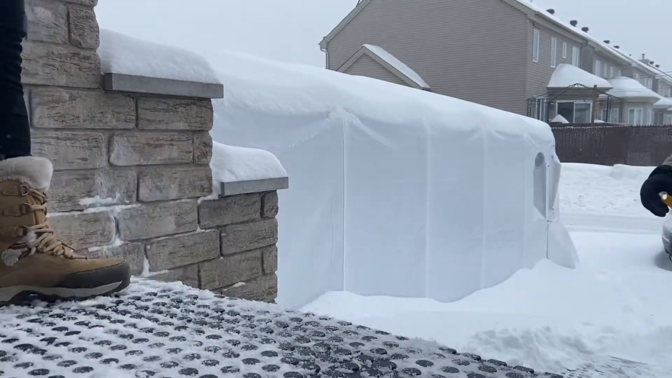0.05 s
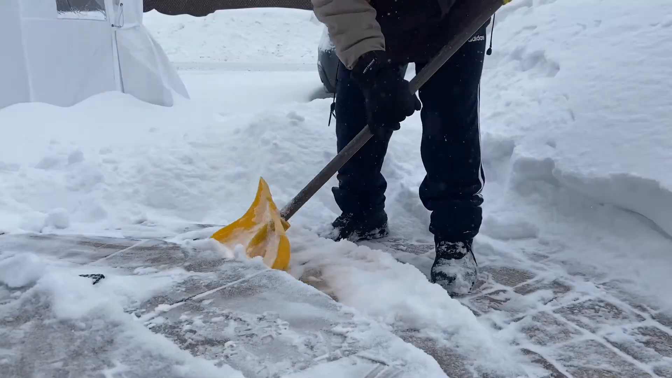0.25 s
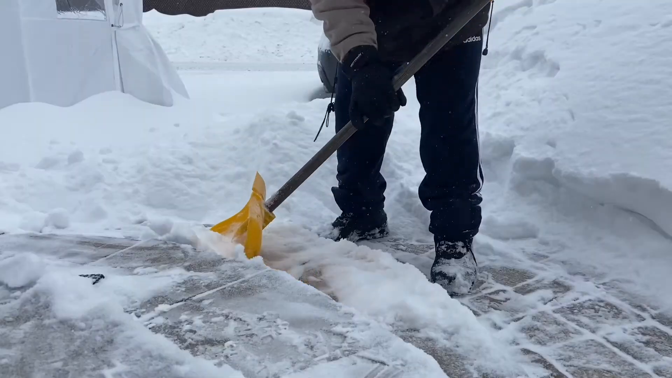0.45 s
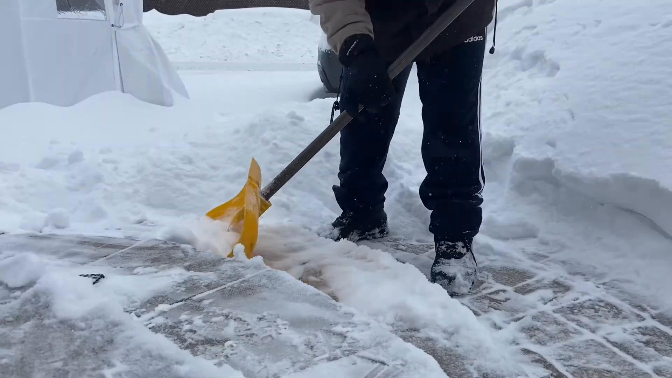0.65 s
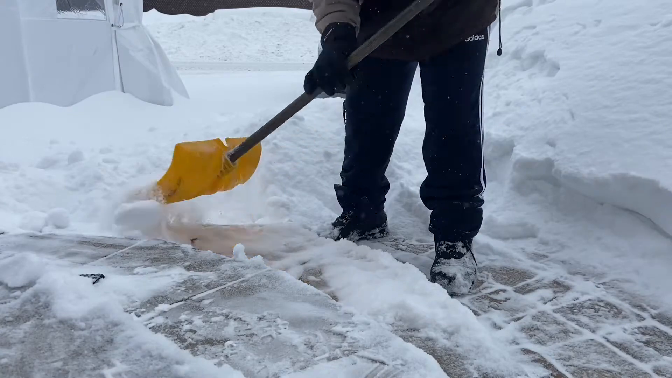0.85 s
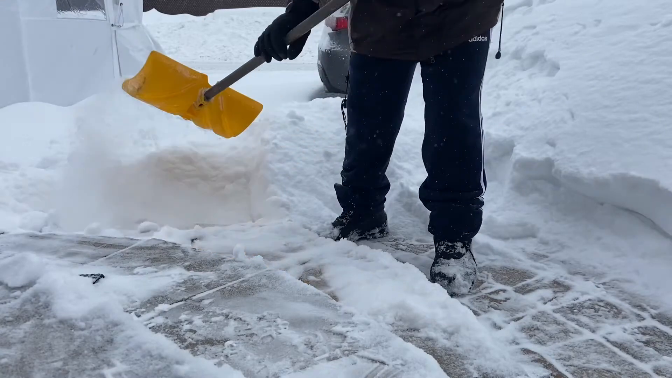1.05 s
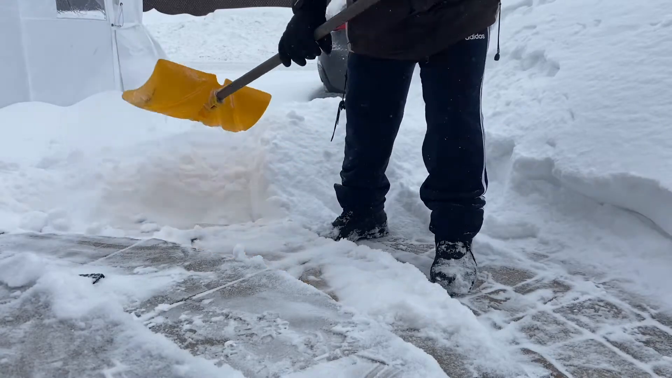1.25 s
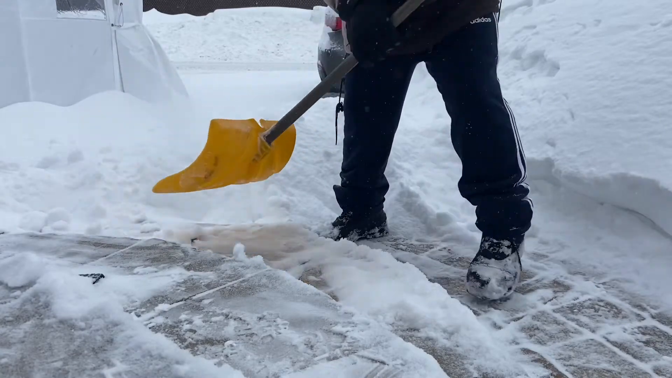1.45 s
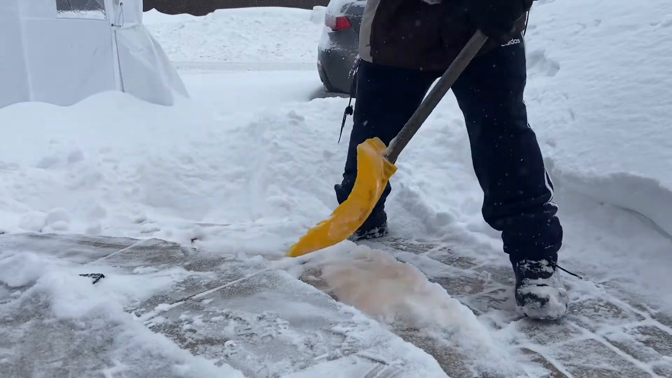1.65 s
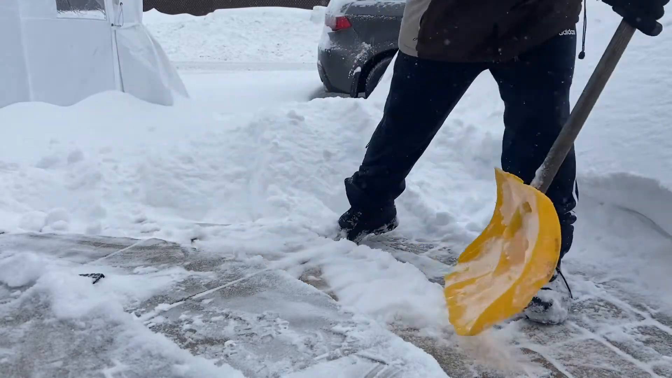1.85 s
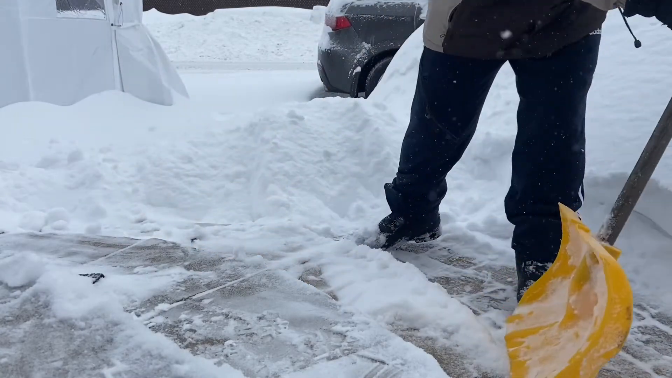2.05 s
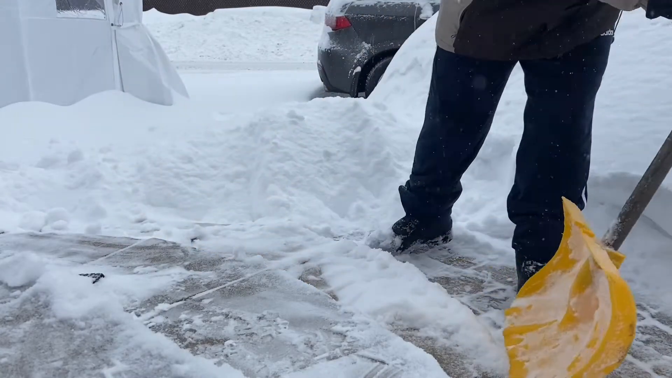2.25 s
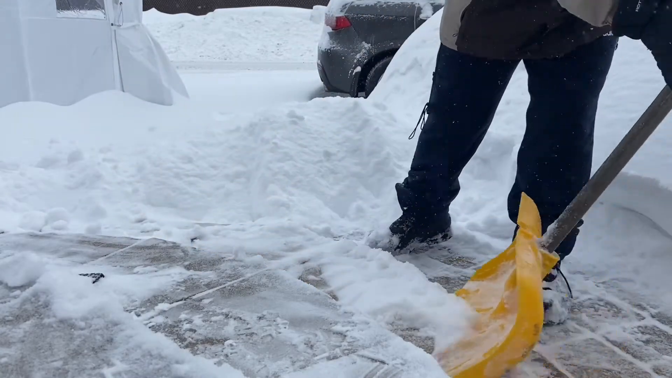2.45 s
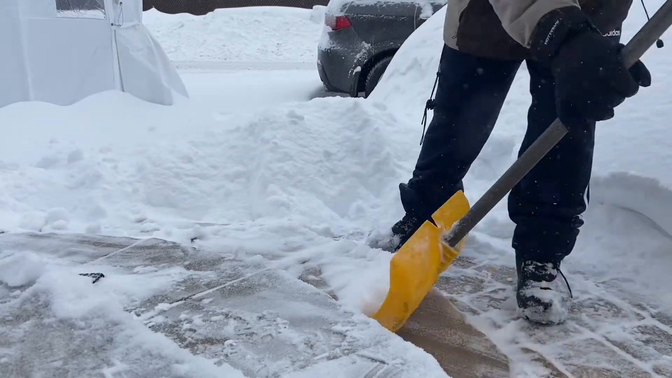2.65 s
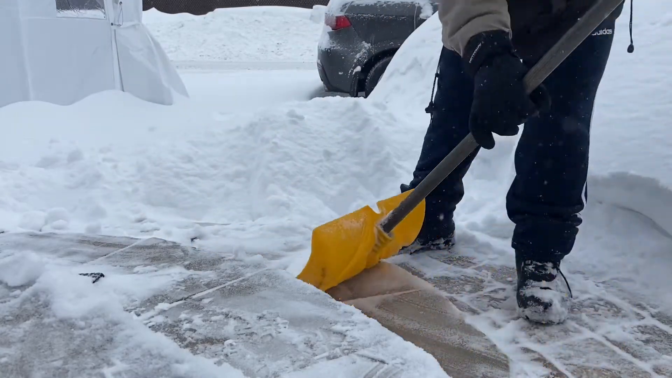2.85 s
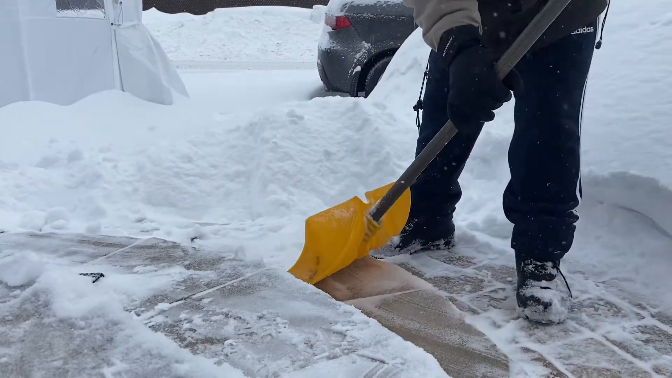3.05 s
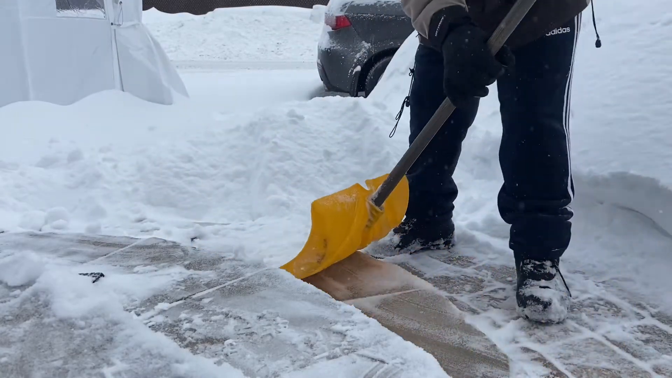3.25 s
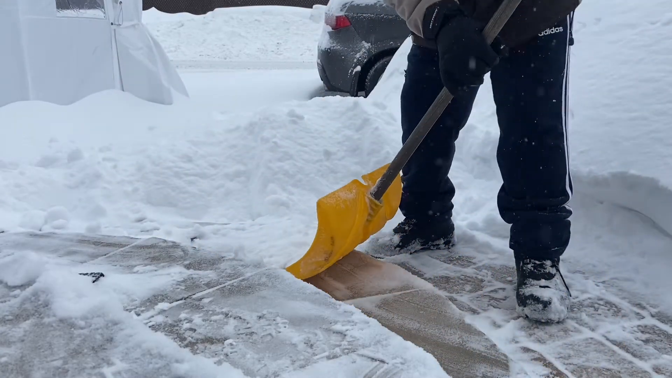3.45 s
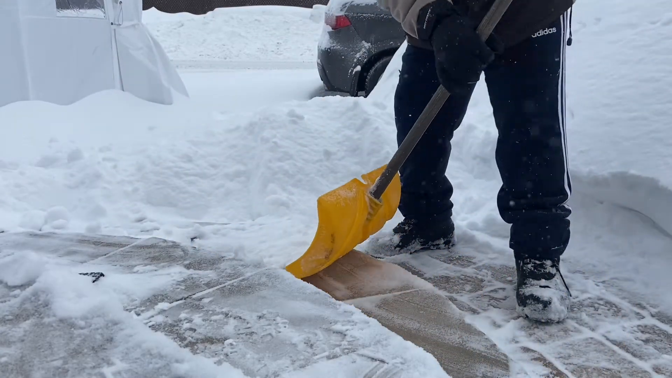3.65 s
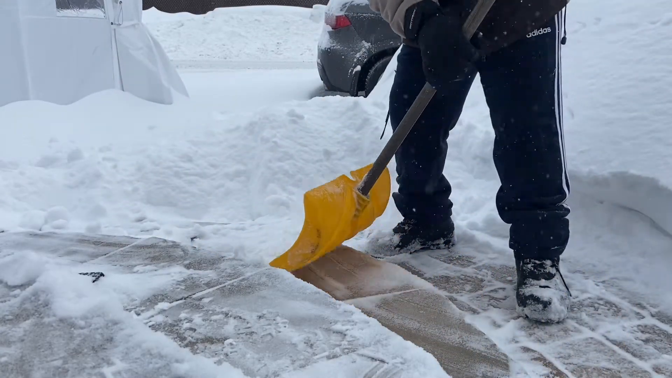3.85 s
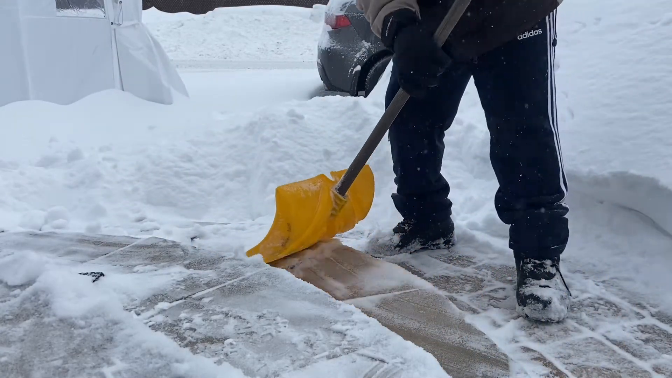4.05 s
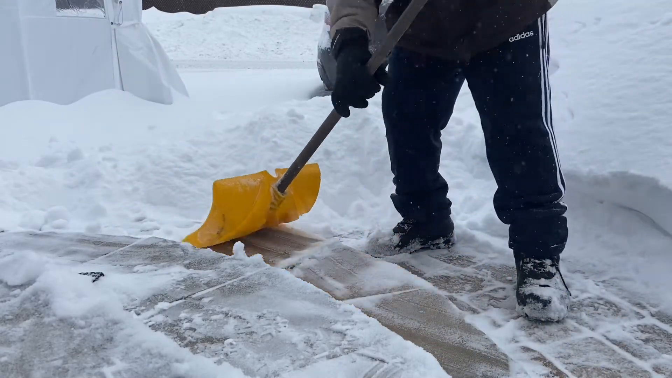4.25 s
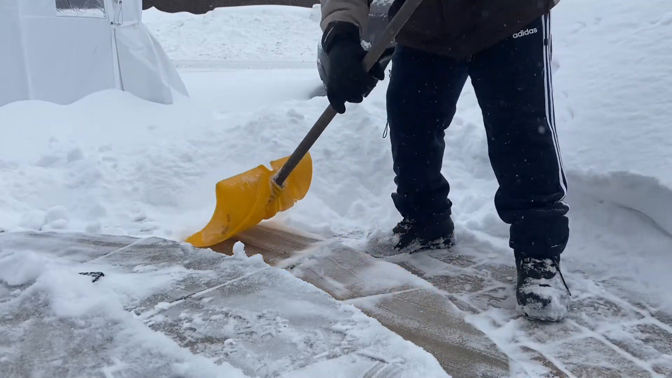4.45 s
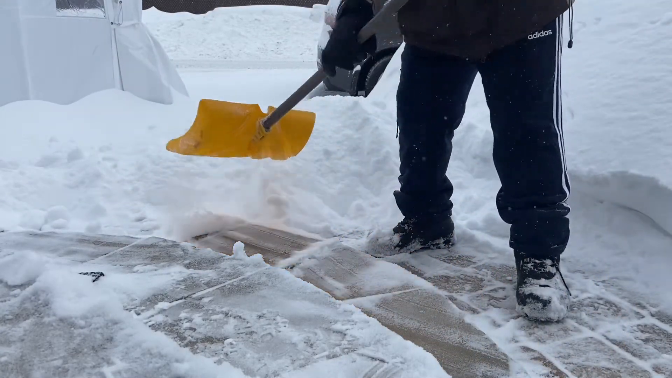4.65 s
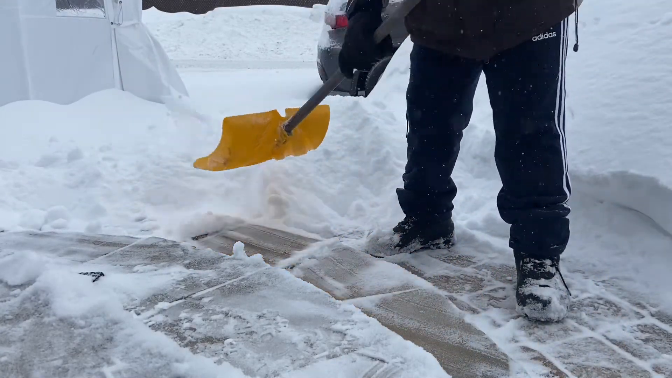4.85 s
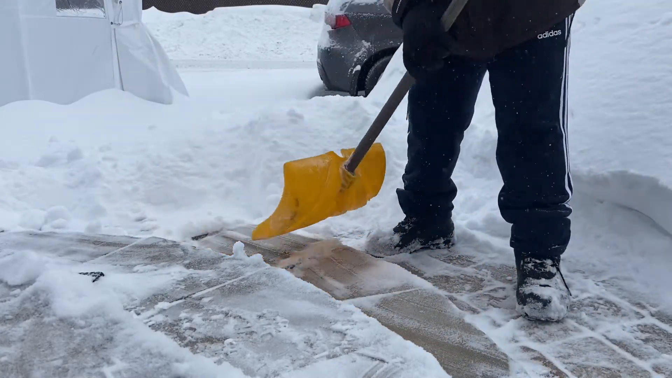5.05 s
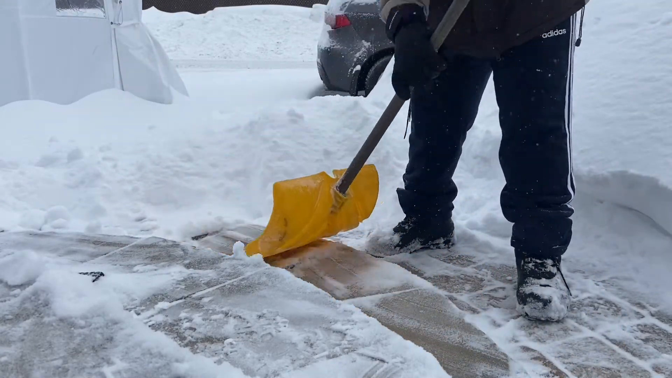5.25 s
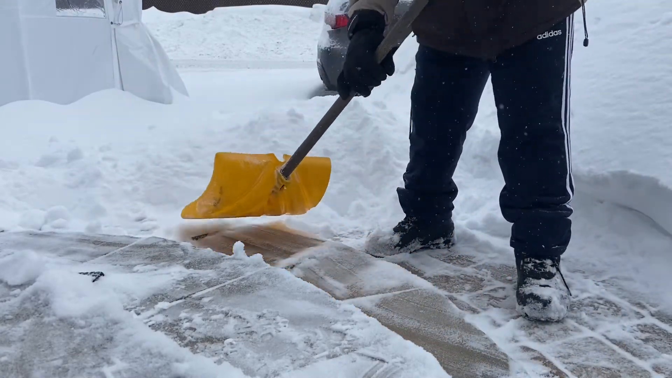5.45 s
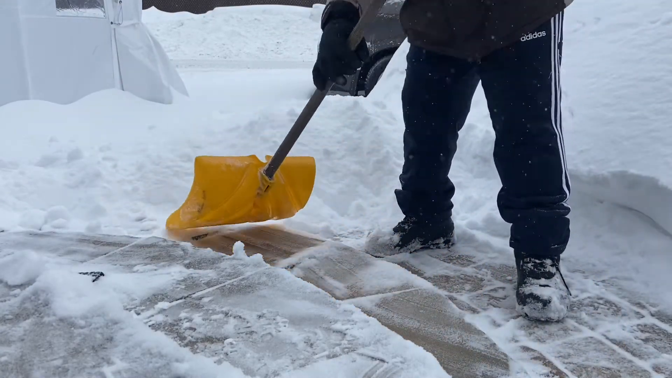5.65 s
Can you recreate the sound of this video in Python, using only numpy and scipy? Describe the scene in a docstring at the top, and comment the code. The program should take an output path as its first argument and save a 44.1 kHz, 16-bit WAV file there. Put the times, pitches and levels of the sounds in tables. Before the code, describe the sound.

A plastic snow shovel scrapes in short gritty strokes over paving stones and knocks hollowly on the joints in a quiet snowy yard.

```python
"""A snowy yard with paving stones: a plastic snow shovel scrapes in short strokes and knocks on the joints.
Grains drive the resonances of the dragged blade; each blow starts damped modes, and crisp snaps are short
ringing noise. Snow slides and clothes rustle as filtered grains between strokes; a hush, a far rumble
(shaped noise) and a faint hum (a wavering sine) fill the yard, and sparse echoes answer the shovel."""
import sys
import numpy as np
from scipy import signal
from scipy.fft import rfft, irfft
from scipy.io import wavfile

SR = 44100
rng = np.random.default_rng(int(sys.argv[2]) if len(sys.argv) > 2 else 0)


def master(y):
    """Save y as 16-bit WAV."""
    cut = np.clip(np.atleast_2d(y).T, -1, 1)
    pcm = np.round(cut * 32767)  # scale
    wavfile.write(sys.argv[1], SR, pcm.astype(np.int16))


N = 251370  # samples


def gain_of(db):
    """Level definition: decibels to amplitude ratio."""
    return 10 ** (np.asarray(db) / 20)


def evened(x):
    """Normalization to unit root-mean-square amplitude."""
    return x / np.sqrt(np.mean(x ** 2) + 1e-20)


def read(points, hz):
    """Interpolation along a logarithmic frequency axis."""
    f, value = np.transpose(points)
    return np.interp(np.log(hz + 1), np.log(f + 1), value)


def add(mix, s, sound, pan_db):
    """Superposition at time s with a level difference between the channels; positive pan_db leans left."""
    part = mix[:, round(s * SR):][:, :len(sound)]
    channel_db = np.array([[.5], [-.5]]) * pan_db
    part += sound[:part.shape[1]] * gain_of(channel_db)


def coloured(x, gain):
    """Linear filtering: multiplies the spectrum by gain(Hz)."""
    hz = np.fft.rfftfreq(x.shape[-1], 1 / SR)
    return irfft(rfft(x) * gain(hz), x.shape[-1])


def band(x, lo_hz, hi_hz):
    """Band-pass filtering with a Butterworth response."""
    return signal.sosfilt(signal.butter(2, [lo_hz, hi_hz], "band", fs=SR, output="sos"), x)


def wandering(count, step):
    """Slow random modulation: normal values every step samples, joined by straight lines."""
    steps = np.arange(0, N + step, step)
    return [np.interp(np.arange(N), steps, row) for row in rng.standard_normal((count, len(steps)))]


def ringing(x, modes, best_hz, slope_db, wander_db):
    """Forced resonance of a damped blade: modes near the moving pitch best_hz ring most; each waxes and wanes."""
    total, power = 0, 0
    for k, ((f, width, db), wander) in enumerate(zip(modes, wandering(len(modes), 2000))):
        octaves_off = abs(np.log2(f / best_hz))
        weight = gain_of(db - slope_db * octaves_off + wander_db * wander)
        drive = np.roll(x, 97 * k)  # each mode is caught a little further along the edge
        ring = evened(coloured(drive, lambda hz: 1 / (1 + 1j * (hz - f) / width) ** 2))
        total = total + weight * ring
        power = power + weight ** 2
    return total / np.sqrt(power)


def grains(per_s, spread_db, clump_db):
    """Random impulse process: tiny impacts of uneven size that come in clumps a few ms long."""
    size = gain_of(spread_db * np.minimum(rng.exponential(1, N), 5)) * rng.standard_normal(N)
    clumps = evened(band(rng.standard_normal(N), 27.0, 126))
    return evened(size * (rng.random(N) < per_s / SR) * gain_of(clump_db * clumps))


def columns(rows):
    """Envelope interpolation: sample range, a soft edge and the joined columns of one stroke."""
    s, *rest = np.transpose(rows)
    at = slice(round(s[0] * SR), min(round(s[-1] * SR), N))
    t = np.arange(at.start, at.stop) / SR
    edge = np.clip(np.minimum(t - s[0], s[-1] - t) / 0.0025, 0, 1)
    return at, edge, [np.interp(t, s, c) for c in rest]


# Pressure of the edge, one curve a stroke: t/s, grit level/dB, boom level re grit/dB
STROKES = [
    [(0, -60.5, -12), (.045, -55, -3), (.075, -60, -15)],
    [(0.09, -53.5, 9.5), (0.126, -33.5, -9), (0.168, -40, 13.5), (0.194, -36.5, 7.5), (0.264, -37.5, 15),
     (0.27, -40, 9)],
    [(.52, -54.5, -6), (.535, -40, 5), (.55, -63, 6), (.565, -44, 13), (.6, -31, 6), (.64, -36.5, 7),
     (.68, -33.5, 11.5), (.71, -78, 17)],
    [(2.17, -54.5, -16), (2.224, -37, -2), (2.26, -38.5, 4), (2.314, -29, -2.5), (2.47, -30, -16),
     (2.59, -29.5, 2.5), (2.65, -35, 2.5), (2.668, -26.5, -0.5), (2.796, -30.5, -11), (2.809, -27, -5)],
    [(3.09, -48.5, -8), (3.13, -45.5, 10), (3.17, -52.5, 7.5), (3.21, -56, 8)],
    [(3.76, -55.5, 0), (3.782, -43.5, -3), (3.808, -40, -2), (3.942, -44, 6.5), (4.082, -29, -0.5),
     (4.172, -29.5, -0.5), (4.178, -26, 4)],
    [(4.4, -51, 9), (4.415, -50, 21.5), (4.44, -31.5, 11.5), (4.46, -73, 14)],
    [(5.06, -59, -3), (5.076, -42, -4), (5.084, -37, -1.5), (5.222, -25, -0.5), (5.266, -36, 2.5),
     (5.3, -68, 7)],
    [(5.63, -54.5, 17.5), (5.656, -43.5, 4.5), (5.7, -45, 3.5)],
]
# Colour of each stroke: favoured boom f/Hz at start, at end, favoured rasp f/Hz at start, at end,
# fizz level re grit/dB (before FIZZ_LOSS), crunch depth/dB
COLOURS = [(700, 1100, 2500, 2200, -1, -8.5), (604, 890, 1850, 1800, -16, 3),
           (710, 510, 1180, 840, -16.5, 5.5), (420, 820, 2830, 2390, -14.5, 0),
           (400, 900, 1700, 2000, -16.5, 1), (560, 560, 2540, 2100, -8, -0.5),
           (476, 330, 1400, 1800, -15.5, 5), (387, 985, 2550, 1800, -13, 0),
           (408, 480, 1100, 1900, -5.5, 1)]
# Boom resonances of the dragged blade: f/Hz, half-width/Hz, level/dB
BOOM_MODES = [(350, 125, 15), (393, 37, -25), (667.5, 111, 13), (753, 380, 1.5), (881, 120, 4.5)]
# Rasp resonances of the edge on grit: f/Hz, half-width/Hz, level/dB
GRIT_MODES = [(1295, 87, 19.5), (1470, 270, -11), (1654, 510, 17), (2282, 150, 8), (2678, 110, 11.5),
              (3014, 130, 10.5), (3210, 690, 10), (3640, 1300, 4.5)]
# Spectrum of crushed snow: f/Hz, level/dB (relative)
FIZZ_SPECTRUM = [(2900, -41), (4000, -8.5), (5000, -7.5), (7000, -7.5), (10000, -12), (13000, -8.5),
                 (16400, -17)]
FIZZ_LOSS = .4  # dB of fizz lost for each dB of boom: a loaded blade muffles the snow
RUN_OUT_S = .006  # the edge slides on briefly after the last push


def scraping():
    """Forced resonance: grit and ice catch the edge; the blade booms, the edge rasps, crushed snow fizzes."""
    catches, bumps = grains(8000, 1.8, 1.3), grains(2000, 2.2, 1.6)
    later_catches = np.roll(catches, -round(.05 * SR))
    fizz = coloured(later_catches, lambda hz: gain_of(read(FIZZ_SPECTRUM, hz)))
    fizz = fizz / np.std(band(fizz, 5000, 8000))
    # load and angle shift the colour
    t, colour = np.arange(N) / SR, np.array(COLOURS)
    ends = np.ravel([(rows[0][0], rows[-1][0]) for rows in STROKES])
    boom_hz = np.interp(t, ends, colour[:, :2].ravel())
    rasp_hz = np.interp(t, ends, colour[:, 2:4].ravel())
    boom = ringing(bumps, BOOM_MODES, boom_hz, slope_db=10, wander_db=3)  # slope per octave
    grit = ringing(catches, GRIT_MODES, rasp_hz, slope_db=9, wander_db=3)
    crunch = evened(band(rng.standard_normal(N), 11.4, 62))  # crust breaks in bursts
    out = np.zeros((2, N))
    for rows, (*_, fizz_db, crunch_db) in zip(STROKES, COLOURS):
        run_out = (rows[-1][0] + RUN_OUT_S, *rows[-1][1:])
        at, edge, (db, boom_db) = columns([*rows, run_out])
        crisp = grit[at] + gain_of(fizz_db - FIZZ_LOSS * boom_db) * fizz[at]
        sound = gain_of(crunch_db * crunch[at]) * crisp + gain_of(boom_db) * boom[at]
        add(out, rows[0][0], sound * edge * gain_of(db), 0)
    return out


# Sliding snow and clothes, level of the middle range: t/s, level/dB
RUSTLE = [(0, -63), (.07, -62), (.085, -66), (.3, -64), (.5, -59.5), (.72, -53.5), (.8, -71.5), (.93, -69),
          (1, -56.5), (1.12, -70.5), (1.33, -57), (1.4, -68.5), (1.53, -54.5), (1.62, -62.5), (1.95, -61),
          (2.06, -60.5), (2.12, -49), (2.15, -57), (2.8, -38), (2.865, -91), (2.95, -51), (3.12, -52),
          (3.25, -71), (3.4, -63.5), (3.7, -77), (4.2, -55.5), (4.5, -60), (4.8, -95), (4.89, -64),
          (5.04, -56), (5.33, -72), (5.45, -66), (5.6, -83)]
DULL_DB, BRIGHT_DB = 2.5, -9.5  # dull part and 5-8 kHz of the bright part, mean re middle
COLOUR_DRIFT_DB = 3.5  # random drift of both
SETTLE_DB, SETTLE_T60_S = -26, 0.11  # dull slide of snow shaken off by each blow, re its level


def rustling():
    """Granular friction: soft dense grains in a dull, a middle and a bright range; blows shake snow loose."""
    soft, t = grains(6000, 2.2, 0.99), np.arange(N) / SR
    dull = evened(band(soft, 350, 1300))
    middle = evened(band(soft, 1100, 3800))
    bright = band(soft, 4000, 15500)
    bright = bright / np.std(band(bright, 5000, 8000))
    dull_drift, bright_drift = wandering(2, 3000)
    sound = middle + gain_of(DULL_DB + COLOUR_DRIFT_DB * dull_drift) * dull
    sound = sound + gain_of(BRIGHT_DB + COLOUR_DRIFT_DB * bright_drift) * bright
    settling = np.zeros(N)
    for s, db, *_ in KNOCKS:
        settling += gain_of(db + SETTLE_DB - 60 * abs(t - s) / SETTLE_T60_S) * (t > s)
    return sound * gain_of(np.interp(t, *np.transpose(RUSTLE))) + settling * dull


# Spectrum of the background: f/Hz, spectral level/dB (relative)
YARD_SPECTRUM = [(12, -44.5), (20, -34.5), (34, -6.5), (75, -3), (135, -15), (160, -16.5), (224, -19),
                 (1600, -45), (9350, -49.5), (11400, -55.5), (13100, -45), (14700, -47), (16400, -79.5)]
YARD_DB = -46
# Far rumble: t/s, level/dB
RUMBLE = [(0, -41), (.75, -41), (1.05, -45), (5.7, -44.5)]
# Faint hum: t/s, level/dB, f/Hz
HUM = [(0.702, -77, 291.7), (.85, -56, 286.7), (1.7, -58, 286), (1.9, -56, 287.2), (5.2, -66, 255),
       (5.7, -56, 268.7)]


def yard():
    """Stationary noise shaped into a hush and a lumpy far rumble, with a frequency-modulated sine as hum."""
    t = np.arange(N) / SR
    hush = evened(coloured(rng.standard_normal(N), lambda hz: gain_of(read(YARD_SPECTRUM, hz))))
    # rumble between about 36 and 200 Hz
    low = coloured(hush, lambda hz: 1 / (1 + (hz / 200) ** 4) / (1 + (36 / (hz + 1)) ** 4))
    rumble = gain_of(np.interp(t, *np.transpose(RUMBLE))) * evened(low)
    s, hum_db, hum_hz = np.transpose(HUM)
    phase = 2 * np.pi * np.cumsum(np.interp(t, s, hum_hz)) / SR
    hum = gain_of(np.interp(t, s, hum_db)) * np.sqrt(2) * np.sin(phase)
    dip = np.interp(t, [.055, .075, .085, .1], [1, 0.048, 0.073, 1])  # hush and rumble dip briefly
    return dip * (gain_of(YARD_DB) * band(hush, 140, 17000) + rumble) + hum


# Blows on the blade: t/s, body level/dB, thud level re body/dB, tick level re body/dB,
# favoured ring f/Hz, favoured thud f/Hz
KNOCKS = [(0.028, -32, -3, -22, 684, 123), (0.163, -19.5, -2, -11.5, 705, 275),
          (0.271, -3, -8.5, -28.5, 620, 161), (0.36, -31, -9, -16, 447, 105),
          (0.405, -39, 1.5, -12, 401, 92), (0.562, -32, 12, -20, 600, 300),
          (0.585, -11.5, -36, -17, 790, 334), (0.665, -18.5, -10.5, -2, 637, 92),
          (0.722, -35.5, -5, -6, 590, 129), (1.253, -31.5, -5, -19, 401, 140),
          (1.321, -38.5, -23, -19, 447, 92), (1.46, -46, 18, -4, 588.4, 140),
          (1.899, -29.5, -2, -23, 401, 257), (1.97, -14, -2.5, -9, 950, 120),
          (2.022, -35, 7.5, -1, 511, 124.5), (2.533, -26.5, -2, 3, 775, 342),
          (2.663, -44, -21, -8, 711, 300), (2.813, -3, -4.5, -19, 476, 246),
          (2.895, -31.5, -18, -19, 530, 307), (3.104, -33.5, 3.5, -14, 468, 298),
          (3.138, -28, 1.5, -27, 500, 273), (3.198, -24.5, -5, -16, 935, 237),
          (3.353, -32.5, 0.5, -16.5, 406, 321), (3.389, -36, 1.5, -15, 553, 91),
          (3.407, -27, -9, -23, 565, 103), (3.592, -37.5, -2, -19, 586, 92.5),
          (3.622, -36, -10, -12, 630, 128), (3.725, -42, -18, -23, 401, 93),
          (4.183, 1, -7.5, -17, 680, 201), (4.35, -42.5, -0.5, -5, 549, 147.3),
          (4.423, -11.5, -4, -24.5, 473, 304), (4.435, -21, -30.5, -31, 476, 350),
          (4.497, -34, 0.5, 0.5, 453, 188), (5.464, -24, 5, -21, 416, 265.5),
          (5.632, -25.5, -8, -17.5, 791, 361)]
# Modes of blade and shaft: f/Hz, level/dB, t60/s (before the stretch); the first five make the thud
BLADE_MODES = [(58, -24, 0.18), (114.3, -12.5, 0.095), (167.3, 2.5, 0.021), (232.6, 3, 0.018),
               (298, -9, 0.044), (485, 0.5, 0.017), (627, -3, 0.026), (892, -7.5, 0.025), (1061, -5, 0.013),
               (1259, -12, 0.022), (1511, -16.5, 0.039), (1772, -9, 0.022), (2278, -1, 0.0082),
               (2510, -15, 0.029)]
LOUD_DB, LEFT_PER_DB = -25, .3  # knocks fainter than LOUD_DB lie further left
RING_PRESSED, RING_FREE = 1.03, 1.07  # stretch of the low rings and the tick: blade in a stroke, or free


def knocks():
    """Modal excitation: a blow starts the modes, the low ones later; its place favours some pitches."""
    t, out = np.arange(round(.25 * SR)) / SR, np.zeros((2, N))
    hz, mode_db, t60 = np.array(BLADE_MODES).T[:, :, None]
    low = np.arange(len(BLADE_MODES))[:, None] < 5
    late = np.maximum(t - 1.11 / hz, 0)  # slow low bending waves arrive about one cycle late
    rise = 1 - np.exp(-late * hz / np.where(low, .8, .4))
    for s, db, thud_db, tick_db, ring_hz, thud_hz in KNOCKS:
        pressed = any(rows[0][0] < s < rows[-1][0] + .01 for rows in STROKES)
        stretch = RING_PRESSED if pressed else RING_FREE
        detune = 1 + 0.054 * rng.standard_normal((len(BLADE_MODES), 1))
        octaves_off = abs(np.log2(hz / np.where(low, thud_hz, ring_hz)))
        favour_db = -np.where(low, 9, 7) * octaves_off
        decay_db = -60 * late / (t60 * np.where(hz < 1200, stretch, 1))
        modes = gain_of(mode_db + favour_db + decay_db) * rise * np.sin(2 * np.pi * hz * detune * late)
        thud, body = (modes * low).sum(0), (modes * ~low).sum(0)
        tick = band(rng.standard_normal(len(t)), 1400, 8700) * gain_of(-60 * t / (0.028 * stretch))
        blow = body / abs(body).max()
        blow = blow + gain_of(thud_db) * thud / abs(thud).max()
        blow = blow + gain_of(tick_db) * tick / abs(tick).max()
        add(out, s - .0012, gain_of(db) * blow, LEFT_PER_DB * max(LOUD_DB - db, 0))
    return out


# Crisp snaps of crust and cloth: t/s, peak level/dB, pitch f/Hz, t60/s
SNAPS = [(0.5239, -32, 1940, 0.092), (0.9842, -35.5, 2030, 0.096), (0.9948, -54, 1930, 0.026),
         (1.1509, -26, 7420, 0.013), (1.2093, -29.5, 6160, 0.007), (1.293, -39, 2960, 0.023),
         (2.0822, -34.5, 6900, 0.0086), (2.1183, -35.5, 3040, 0.042), (2.898, -37, 3000, 0.029),
         (3.296, -41, 2340, 0.013), (3.449, -47, 2100, 0.072), (4.886, -46, 4370, 0.15),
         (5.453, -43.5, 2110, 0.018)]


def snaps():
    """Impulsive fracture: a decaying click of wide noise with a short noisy ring at its pitch."""
    t, out = np.arange(round(.08 * SR)) / SR, np.zeros((2, N))
    for s, db, hz, t60 in SNAPS:
        noise = rng.standard_normal(len(t)) * gain_of(-60 * t / t60)
        ring = evened(band(noise, hz * 0.82, hz * 1.28))
        snap = ring + 1.05 * evened(band(noise, 1300, 9800))
        add(out, s - .001, gain_of(db) * snap / abs(snap).max(), pan_db=0.5)
    return out


# Decay of the echoes: f/Hz, t60/s
WALLS = [(100, 0.21), (500, 0.18), (2000, 0.05), (8000, 0.15)]


def walls(x):
    """Reverberation: sparse echoes from house and snow banks, each band dying at its own speed."""
    taps = rng.choice([-1., 1.], (2, SR // 2)) * (rng.random((2, SR // 2)) < .05)
    taps = taps + .5 * taps[::-1]  # both channels share most echoes
    hz, t, z = signal.stft(taps, SR, nperseg=256)
    decay = gain_of(-60 * t / read(WALLS, hz)[:, None])
    tail = signal.istft(z * decay, SR, nperseg=256)[1]
    tail = np.pad(tail, ((0, 0), (200, 0)))  # delay before the first echo, in samples
    return signal.fftconvolve(x, tail / np.linalg.norm(tail[0]), axes=1)[:, :N]


def scattered(x):
    """Decorrelation: three short noise patterns fade in turn at a steady rate, widening the sound."""
    taps = rng.standard_normal((3, 600)) * gain_of(-60 * np.arange(600) / 600)
    turn = np.pi * np.arange(N) / SR / .31 + np.pi / 3 * np.arange(3)[:, None]
    fed = np.sqrt(2 / 3) * np.cos(turn) * x
    taps = taps / np.linalg.norm(taps, axis=1)[:, None]
    return signal.fftconvolve(fed, taps, axes=1)[:, :N].sum(0)


def scene():
    """Superposition of the near shovel sounds, their echoes, the rustle and the yard."""
    near = scraping() + knocks() + snaps()
    echoes = gain_of(-15.5) * walls(near.mean(0, keepdims=True))
    return near + echoes + rustling() + yard()


# Likeness of left and right: f/Hz, likeness (0 to 1)
LIKENESS = [(40, .98), (125, .95), (300, .85), (1500, .8), (4500, .6), (7500, .5)]
# Two treble bands heard with opposite sign left and right: lower f/Hz, upper f/Hz
OPPOSITE_SIGN = [(8350, 9714), (12450, 14200)]
# Excess of the left channel: f/Hz, level/dB
LEFT_LOUDER = [(60, 0), (1500, 1), (4500, 4), (9000, 2)]
EDGE_HZ = 16100  # upper band limit


def sign_flip(hz):
    """Stereo width: share of one channel's sign flip, near 1 inside the two bands and near 0 outside."""
    return sum(1 / (1 + ((2 * hz - lo - hi) / (hi - lo)) ** 20) for lo, hi in OPPOSITE_SIGN)


def record(dry):
    """Mid-side stereo: decorrelation, a left lean and sign flips set the width; then overload, band limit."""
    mid = dry.mean(0)
    apart = coloured(scattered(mid), lambda hz: np.sqrt(np.clip(1 - read(LIKENESS, hz), 0, 1) / 2))
    leaning = coloured(mid, lambda hz: np.tanh(np.log(gain_of(read(LEFT_LOUDER, hz))) / 2))
    side = (dry[0] - dry[1]) / 2 + apart + leaning
    side = coloured(side, lambda hz: 1 / (1 + (hz / 7500) ** 10))
    side = side + coloured(mid, sign_flip)
    mid = coloured(mid, lambda hz: 1 - sign_flip(hz))
    pair = np.array([mid + side, mid - side])
    pair = pair / (1 + (abs(pair) / .95) ** 4) ** .25  # soft overload
    lowpass = signal.firwin(511, EDGE_HZ, window=("kaiser", 13), fs=SR)
    return signal.oaconvolve(pair, lowpass[None], "same")


dry = scene()
out = record(dry)
master(out)
```